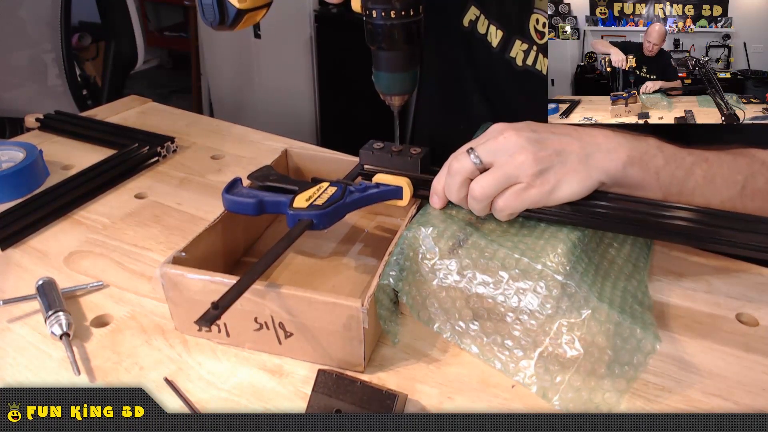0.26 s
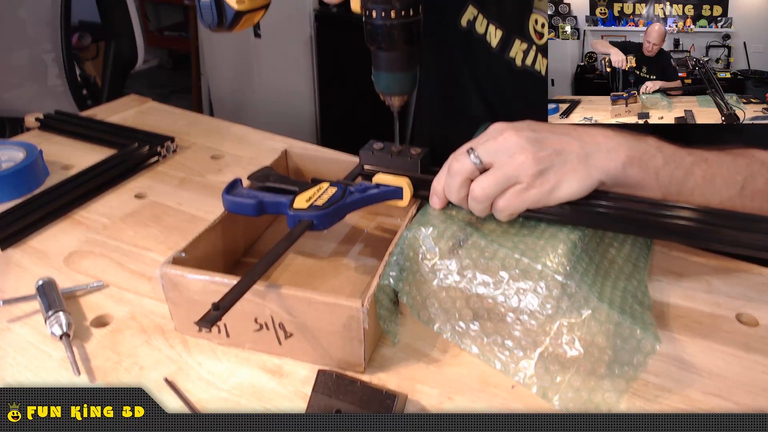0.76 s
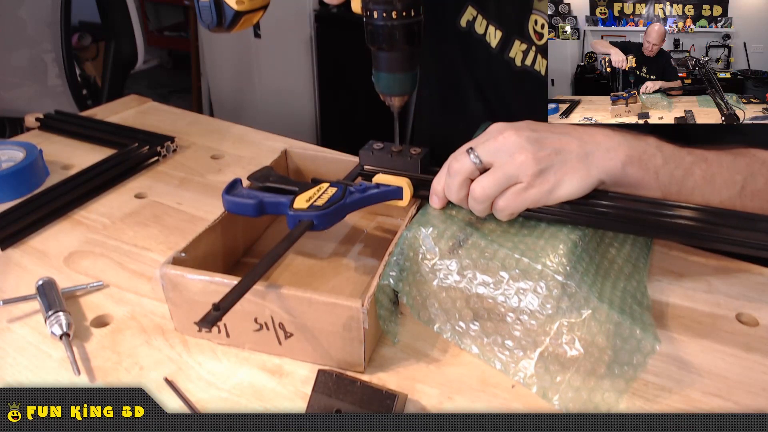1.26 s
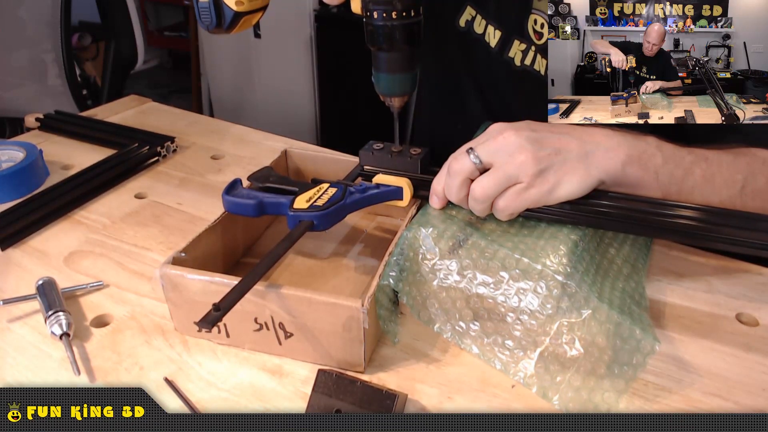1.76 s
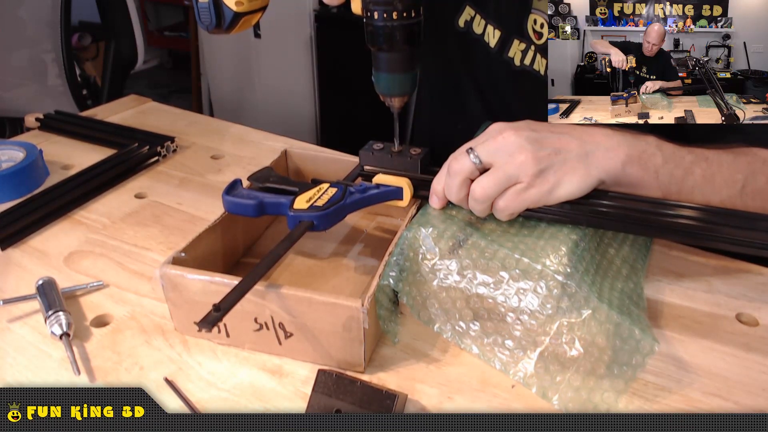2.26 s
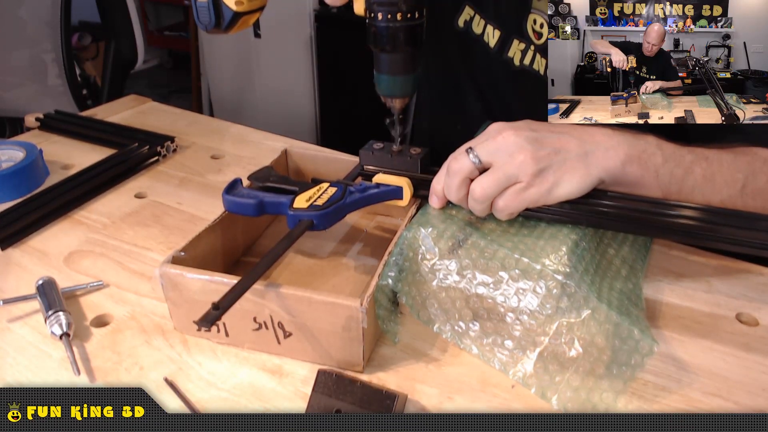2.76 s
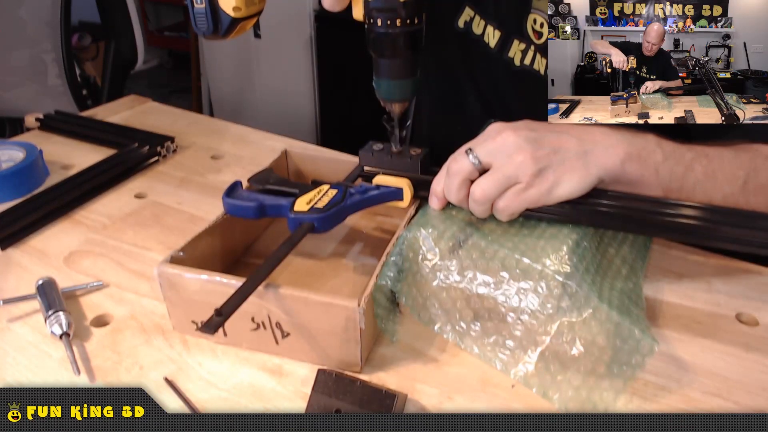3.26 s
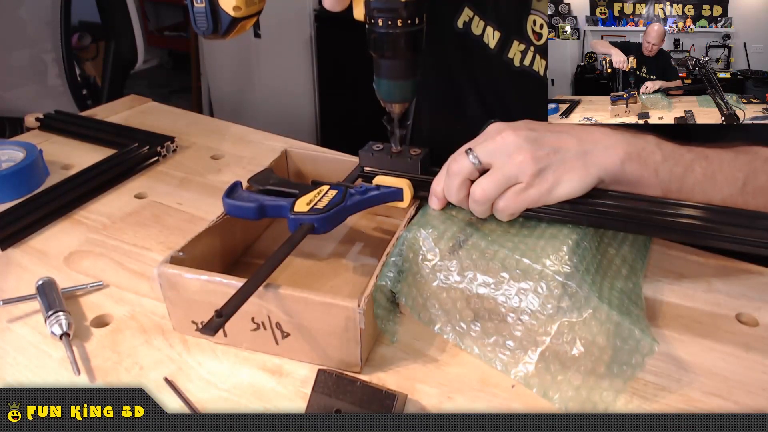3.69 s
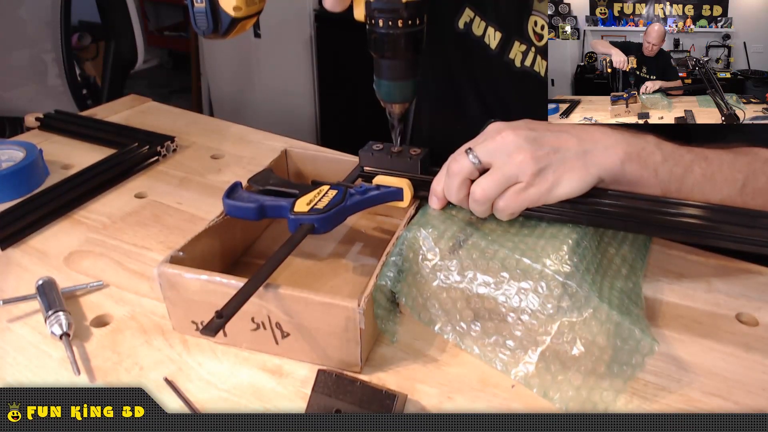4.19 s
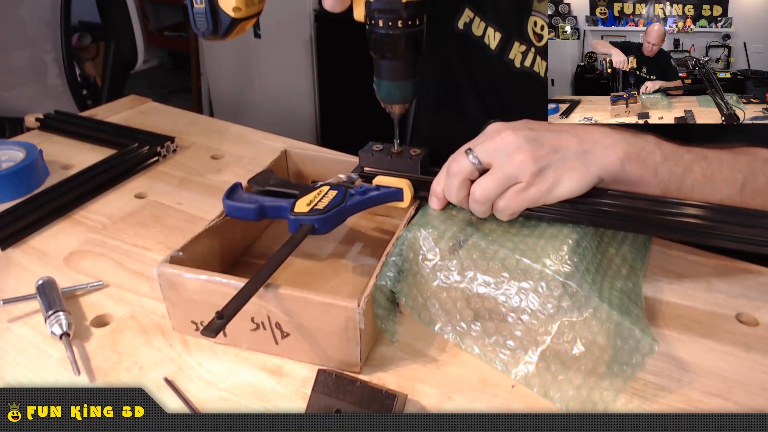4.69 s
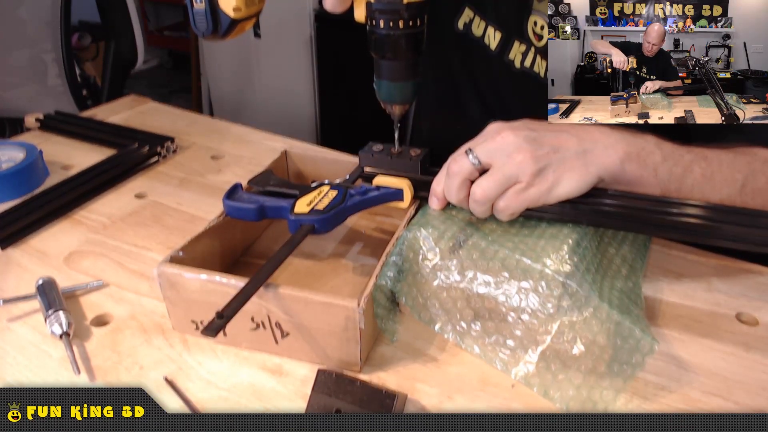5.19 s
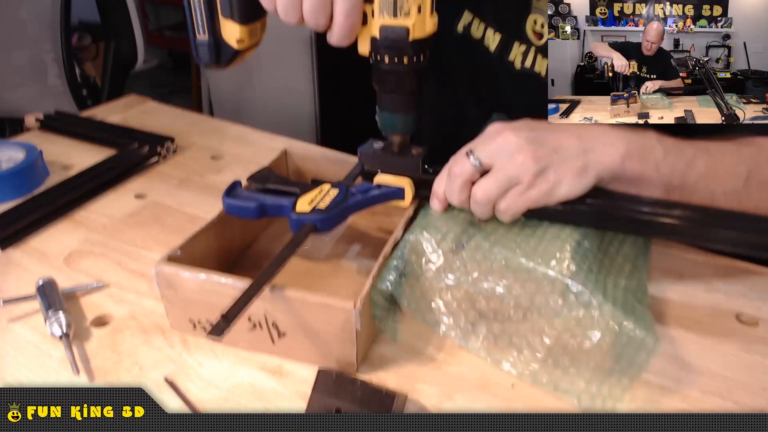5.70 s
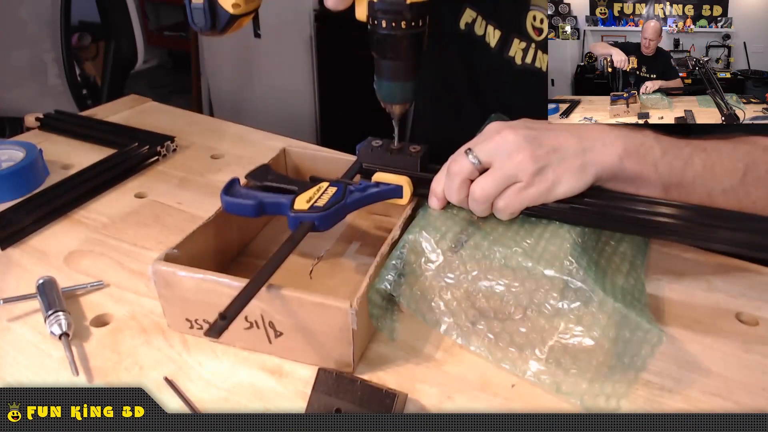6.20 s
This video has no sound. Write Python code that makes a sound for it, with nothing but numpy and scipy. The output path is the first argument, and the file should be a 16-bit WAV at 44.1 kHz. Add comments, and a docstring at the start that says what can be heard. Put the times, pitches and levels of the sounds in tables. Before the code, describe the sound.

A cordless drill whines up to speed, bores through clamped aluminium, snaps through with sharp cracks, then clunks free and revs as a steady thin whistle sings.

```python
"""A whine and rattle climb in pitch as a cordless drill spins up, under the steady whistle of its speed control.
It bores through an aluminium bar clamped in a jig on a workbench: gear tones follow the motor angle,
random tooth impacts ring the housing, and low noise is fan air on the microphone.
The bit drags and snaps through with decaying bursts, then rubs round the hole in noise pulsed by its flutes.
It knocks on the jig on its way out, the loose gears clatter, and the drill revs free."""
import sys
import numpy as np
from scipy import signal
from scipy.fft import rfft, irfft, next_fast_len
from scipy.io import wavfile
from scipy.ndimage import uniform_filter1d, map_coordinates

SR = 44100
rng = np.random.default_rng(int(sys.argv[2]) if len(sys.argv) > 2 else 0)


def waveform_to_disk(signal):
    """Save audio, clipped to [-1, 1], as 16-bit WAV at the path in sys.argv[1]."""
    frames = np.transpose(np.atleast_2d(signal))
    scaled = np.clip(frames, -1, 1) * 32767
    samples = np.round(scaled).astype(np.int16)
    wavfile.write(sys.argv[1], SR, samples)


N = 284445
T = np.arange(N) / SR  # seconds

# Levels in the tables are relative: stages, speed and trims in the functions add to them.
# In every spectrum below, level_db is the gain at that frequency.

# Motor speed under trigger and load: time_s, speed_turns_per_s
MOTOR_SPEED = [(0.0, 154), (0.1, 222), (0.15, 259), (0.24, 299), (0.34, 322), (0.5, 345), (0.6, 373),
               (0.69, 385), (0.86, 390.5), (0.98, 392), (1.14, 370), (1.32, 357.5), (1.8, 339.5),
               (2.1, 346.6), (2.3, 341), (2.5, 329), (2.63, 313), (2.72, 283), (2.78, 252), (2.8, 219),
               (2.84, 235), (2.89, 268), (3.0, 285), (3.1, 297), (3.19, 311), (3.3, 319.5), (3.45, 311.6),
               (3.65, 318.3), (3.85, 321), (4.25, 316.8), (4.4, 311.5), (4.85, 313.4), (5.08, 301),
               (5.25, 289), (5.34, 269), (5.42, 256), (5.65, 303), (5.77, 289.6), (5.88, 308), (5.94, 305),
               (6.04, 262), (6.11, 237), (6.2, 356), (6.28, 357), (6.45, 325)]
# Backlash, the shake of the gears about their steady motion: time_s, rms_motor_turns
BACKLASH = [(0, .008), (.3, .008), (.55, 0), (1.7, 0), (2.2, .003), (2.55, .001), (2.75, .009),
            (2.95, .006), (3.2, .003), (5.0, .002), (5.25, .001), (5.45, .012), (5.95, .016), (6.16, .018),
            (6.21, .007), (6.3, .007), (6.37, .014), (6.45, .024)]
# Stages of the job: starting, spinning up, fan picking up, biting, boring, deep in the bar, labouring,
# just through, spinning in the hole, draught easing, brushing the wall, leaning on it, side load growing,
# slowing down, drawn out, clear of the metal, revving free. Columns as named in STAGE_COLUMNS
STAGES = [(0, -3, -3, -24, -62, -65, -7, -0.5), (.11, -9, -2.5, -22.5, -61, -65, -1.5, -1.5),
          (.215, -13, -4, -24.5, -42, -68, -1, -2), (.29, -7, -4, -26, -36.5, -70, -2.5, -2),
          (.55, 0.5, -8, -21, -35.5, -66, -4, 0), (1.33, 0, -5.5, -18.5, -37.5, -64, -7.5, 0.5),
          (2.56, -1, -5.5, -17.5, -34, -59, -1, 0), (2.88, -2, -7.5, -17.5, -46.5, -56, -1.5, 0.5),
          (3.2, -2, -15, -16, -42.5, -56, -4.5, 0.5), (3.55, 0.5, -8, -17, -49.5, -52, -8.5, 1),
          (4.05, -0.5, -4, -16, -46, -54, -4, 1), (4.93, 0.5, 0.5, -19.5, -44.5, -48.5, -6, 1),
          (5.12, -0.5, 1.5, -17.5, -45.5, -50, -1, 0), (5.27, 0, 4, -16.5, -45, -52, 1.5, 0.5),
          (5.412, -12, -25, -19.5, -46.5, -68, -10, 3), (5.92, -11, -11.5, -29, -63.5, -75, -2, -2),
          (6.18, -3.5, -7.5, -28, -53, -74, -11, -2.5)]
STAGE_COLUMNS = ["start_s", "tones_db", "growl_db", "low_mids_db", "draught_db", "rubbing_db", "cry_db", "treble_db"]
BLEND_S = 0.039  # one stage passes into the next

# Tones of motor and gears: multiple_of_motor_speed, then level_db at each of the four TONE_SPEEDS
MOTOR_TONES = [(2.09, -55.5, -70, -72, -80), (2.86, -57, -53, -52, -50.5), (5.154, -56, -55, -53, -48),
               (5.44, -58, -50, -49, -46), (8.02, -57, -48.5, -49.5, -48), (9.2, -54, -58, -58, -55),
               (9.9, -70, -53, -40.5, -43.5), (11.98, -58, -53, -47.5, -44.5), (14.8, -54, -57, -53, -59),
               (18.3, -70, -62, -59, -58), (19.05, -66, -56, -56, -60), (19.75, -68, -59, -55, -58),
               (22.6, -56, -57, -56, -54), (23.2, -55, -62, -62, -60), (23.96, -58, -55, -50, -46),
               (24.65, -60, -53, -52.5, -56), (28.88, -69, -63, -57, -53), (30.2, -75, -68, -58, -66),
               (31, -80, -61, -66, -72), (33.77, -55.5, -63, -70, -78), (34.5, -52, -62, -66, -78)]
# Speeds at which the tone levels are given: speed_turns_per_s
TONE_SPEEDS = [315, 342, 355, 388]
# Resonance of the gearbox at certain speeds: speed_turns_per_s, growl_db, cry_db, keen_db
GEARBOX = [(158, -66, -60, -48), (225, -66, -41, -49), (245, -61, -41, -59), (272, -53, -42, -62),
           (290, -49.5, -44, -45.5), (302, -50.5, -44, -46.5), (313, -51.5, -39.5, -48.5),
           (322, -51.5, -41, -46.5), (342, -47, -46, -53), (355, -52, -45, -49), (390, -56, -46, -52)]
# Rates as multiples of the motor speed
MESH, CRY, KEEN, CARRIER, CHUCK = 2.57, 11.3, 21.76, 0.286, 0.0573
CRUISE = 330  # turns per second, the reference for growth with speed
TONES_DB_PER_OCTAVE, TREBLE_DB_PER_OCTAVE, DRAUGHT_DB_PER_OCTAVE = -2, 8, 16.5  # per doubling of speed
LABOUR_SPEED = 308  # turns per second, below which the motor labours
CHATTER_SPEED, SMOOTH_SPEED = 262, 296  # turns per second
# Chatter of the teeth when slow, when fast, and the least chatter once unloaded (0-1)
ROUGH_SLOW, ROUGH_FAST, ROUGH_FREE = 0.97, 0.3, 0.66
UNLOADED_DB, UNLOADED_PLAY = -2, 1.3  # low gear tones weaken and smear without a load (dB, radians)

# Level of the rattle: time_s, level_db
RATTLE_LEVEL = [(0, -44), (.2, -37.5), (.65, -34.5), (1.15, -34.5), (1.6, -36), (2.6, -35), (2.95, -37),
                (3.3, -36.5), (5.33, -36), (5.4, -37), (5.425, -40), (5.48, -38), (5.6, -39.5), (5.93, -46),
                (6.09, -54), (6.19, -39.5), (6.45, -44)]
# Spectra of the rattle while boring, spinning in the hole and running free: frequency_hz, level_db
BORING_SPECTRUM = [(120, -34), (200, -9.5), (385, -9.5), (515, -9.5), (607, -9), (874, -5), (1210, -5.5),
                   (2060, -0.5), (2510, -2), (2700, -0.5), (4030, -2), (5700, -9), (9140, -13),
                   (11400, -18), (15500, -37)]
IN_HOLE_SPECTRUM = [(120, -20), (200, -15.5), (392, -13.5), (525, -16), (596, -14), (653, -5.5), (783, -5),
                    (1190, -7.5), (1620, -3), (3120, -1), (4030, -2.5), (5490, -6.5), (6710, -8),
                    (11000, -14.5), (15500, -35)]
FREE_SPECTRUM = [(150, -24), (230, -22), (420, -44), (700, -17), (1030, 3), (1300, -12), (1900, -11),
                 (2300, 4), (2800, 10), (3300, 3), (4100, 7), (5300, 2), (6100, -10), (7700, -3.5),
                 (10000, -13), (12000, -6), (15500, -6)]
# Resonances of drill housing and bar: frequency_hz, width_hz, gain_db
BODY_MODES = [(287.5, 13, 4), (386, 90, -6), (517.4, 43, 9.5), (610, 33, -13), (710, 53, -1.5),
              (1286, 280, -3.5), (1528, 115, 4.5), (2210, 40, 3.5), (2530, 690, -3.5), (2750, 150, 3),
              (4250, 210, 2.5), (5700, 960, -4.5), (7630, 1100, 3), (9160, 560, 4), (11000, 660, 0.5)]
REPEAT_LOADED, REPEAT_FREE = 0.09, 0.5  # share of impacts repeating with each carrier turn (0-1)
SCRAPE_S, SCRAPE_WIDTH_S, SCRAPE_DB = 5.63, 0.083, 2.5  # flutes hiss on the jig as the bit is drawn out

# Whistle, fading when the trigger is eased or fully pressed: time_s, level_db
WHISTLE_LEVEL = [(0, -46.5), (2.1, -46), (2.9, -43), (3.6, -46), (5.35, -43.5), (5.68, -53), (5.85, -45.5),
                 (6.06, -66), (6.12, -57), (6.23, -43), (6.36, -58)]
WHISTLE_HZ = 3906.5

# Spectrum of the lumpy fan air at the microphone: frequency_hz, level_db
AIR_SPECTRUM = [(8, 1.5), (20, 5), (35, 6.5), (50, 1.5), (70, -8.5), (100, -13), (150, -26), (220, -54),
                (400, -46), (900, -72)]
# Spectrum of the flapping gusts: frequency_hz, level_db
GUST_SPECTRUM = [(30, -19), (55, 9), (75, 14), (130, 0), (180, -6.5), (260, -13.5), (500, -59)]
# Strongest puffs of fan air: time_s, boost_db
PUFFS = [(.38, 0), (.5, 2), (.65, 8.5), (0.862, 10), (1.01, 6), (1.09, 5), (1.2, 2.5), (1.55, 5.5),
         (2.11, 4), (2.3, 3), (2.45, 5), (2.64, -2), (3.38, 0), (4.25, 6), (5.595, 4), (6.147, 31),
         (6.34, 12), (6.4, 18)]
PUFF_WIDTH_S = 0.016

# Spectrum of the bit against the wall of the hole: frequency_hz, level_db
WALL_SPECTRUM = [(400, -36), (750, 1.5), (1150, -25), (1620, 8), (2100, -4.5), (3200, -12), (6000, -24),
                 (15000, -60)]

# Catches of the bit in the bar: start_s, level_db, thud_relative_db, crack_relative_db, metal_t60_s
BAR_KNOCKS = [(2.632, -20, -29, -5, 0.048), (2.664, -19.5, -24, -12, 0.027), (2.691, -15.5, -16, -3, 0.032),
              (2.724, -21, -18, -8, 0.029), (2.7495, -19, -12, -14, 0.083), (2.779, -19, -4, -8, 0.034),
              (2.788, -8, -35, -2, 0.015), (2.79, -2.5, -18, 1, 0.023), (2.801, -24, -4.5, 0, 0.17),
              (3.327, -14, -32, -13, 0.028), (3.44, -19, -20.5, -9, 0.013), (5.398, -23.5, -11, -10, 0.043)]
# Clunks of the bit on the jig: start_s, level_db, thud_relative_db, crack_relative_db, metal_t60_s
JIG_CLUNKS = [(5.45, -30, 3.5, -12, 0.04), (5.456, -13, -8, -10, 0.011), (5.459, -29, 10, -20, 0.02),
              (5.4628, -14, -8, -8, 0.013), (5.468, -26, 5, -20, 0.024), (5.48, -31.5, 0, -14, 0.15),
              (5.502, -38.5, 9, -14, 0.1), (5.5916, -17, -12, -14, 0.013)]
# Spectra of the struck bar, the bench, the cracking chip and the jig: frequency_hz, level_db
BAR_SPECTRUM = [(300, -47), (800, -22), (1150, -1.5), (1400, -13.5), (1840, 1.5), (2300, -3), (2660, -6.5),
                (3200, -20), (4400, -16), (6000, -16.5), (15000, -44)]
BENCH_SPECTRUM = [(60, -7), (200, -8.5), (290, -1.5), (400, -5), (560, -1), (760, -3.5), (1100, -6),
                  (1800, -15), (6000, -48)]
CRACK_SPECTRUM = [(1500, -27), (4000, -10), (5300, -14), (6300, 2), (7500, -7.5), (8700, -17),
                  (10100, -9.5), (12500, -17), (16000, -37)]
JIG_SPECTRUM = [(300, -22), (700, -16), (1050, -0.5), (1400, 8), (1900, 4), (2800, -1), (3400, -3),
                (4300, -4), (5400, -4), (7000, -8), (15000, -30)]
# Resonances of the bar: frequency_hz, width_hz, gain_db
BAR_MODES = [(1900, 170, -4), (2740, 110, 8), (4340, 50, 4), (6400, 54, -11)]

# Bursts of the unloaded gears as the motor is throttled: time_s, level_db
CLATTERS = [(5.942, -41), (6.014, -47), (6.055, -48), (6.115, -43)]
CLATTER_WIDTH_S = 0.012
# Spectrum of the gearcase: frequency_hz, level_db
GEARCASE_SPECTRUM = [(400, -45), (790, 6), (1050, -17), (2150, -20), (2750, 8), (3500, -1), (4300, -3),
                     (5300, -9), (6500, -10), (9000, -25), (15000, -38)]
LURCH_PEAK_S, LURCH_DB = 6.2, 2  # one crest of the free chuck's lurching, and its swing
EDGE_HZ = 15500  # upper limit of the band


def amp(db):
    """Level law: decibels to gain."""
    return 10 ** (np.asarray(db) / 20)


def unit(x):
    """Normalisation to rms 1."""
    return x / np.sqrt(np.mean(x ** 2) + 1e-20)


def running_rms(x):
    """Root mean square over a sliding quarter of a second."""
    return np.sqrt(uniform_filter1d(x ** 2, SR // 4) + 1e-12)


def read_column(rows, where, axis=1):
    """Linear interpolation of one column against the first."""
    rows = np.asarray(rows, float)
    return np.interp(where, rows[:, 0], rows[:, axis])


def stage(name):
    """A named column, held through each stage and blended into the next."""
    rows = np.asarray(STAGES, float)
    held = rows[np.searchsorted(rows[1:, 0], T), STAGE_COLUMNS.index(name)]
    return uniform_filter1d(held, int(BLEND_S * SR))


def shape(points, hz):
    """A spectrum in dB, joined by straight lines over log frequency."""
    f, db = np.transpose(points)
    return np.interp(np.log(hz + 1), np.log(f + 1), db)


def colour(x, points, modes=()):
    """Linear filtering by a smooth spectrum plus bell-shaped resonances."""
    size = next_fast_len(len(x))
    hz = np.fft.rfftfreq(size, 1 / SR)
    db = shape(points, hz)
    for f, width, gain_db in modes:
        db = db + gain_db / (1 + (2 * (hz - f) / width) ** 2)
    return irfft(rfft(x, size) * amp(db), size)[:len(x)]


def band(x, lo, hi):
    """Zero-phase band-pass between two frequencies in Hz."""
    return signal.sosfiltfilt(signal.butter(3, [lo, hi], "band", fs=SR, output="sos"), x)


def wander(hz):
    """Smooth random fluctuation of rms 1, changing about hz times a second."""
    steps = np.linspace(0, T[-1], int(T[-1] * hz * 8) + 2)
    slow = rng.standard_normal(len(steps))
    for _ in range(2):
        slow = uniform_filter1d(slow, size=4)
    return unit(np.interp(T, steps, slow))


def swell(s, width):
    """A Gaussian rise and fall of height 1 around time s."""
    return np.exp(-((T - s) / width) ** 2)


def clear():
    """Unloading: rises from 0 to 1 as the bit leaves the hole."""
    return np.clip((T - 5.85) / 0.2, 0, 1)


def add(mix, s, sound):
    """Superposition: mixes a sound in at time s."""
    part = mix[max(round(s * SR), 0):][:len(sound)]
    part += sound[:len(part)]


def whine(speed, turns, flutter=0.3, play=0.28, scatter=0.27, labour_db=9.5):
    """Order tones: tooth and slot tones lock to the motor angle; play makes each one flutter and smear."""
    out = np.zeros(N)
    for order, *levels_db in MOTOR_TONES:
        db = np.interp(speed, TONE_SPEEDS, levels_db)
        # the tones fade when the motor labours, the highest most
        db = db - labour_db * order / 12 * np.maximum(LABOUR_SPEED - speed, 0)
        phase = 2 * np.pi * order * turns + play * wander(32)
        if order < CRY / 2:
            db = db + UNLOADED_DB * clear()
            phase = phase + UNLOADED_PLAY * clear() * wander(120)
        steady = (1 + flutter * wander(48)) * np.cos(phase)
        smeared = scatter * wander(110) * np.sin(phase)
        out += amp(db) * (steady + smeared)
    return out * amp(stage("tones_db") + TONES_DB_PER_OCTAVE * np.log2(speed / CRUISE))


def mesh(order, turns, db, rough, smear_hz, surge=0.22, runout=0.19, lopsided=0.14):
    """Load modulation: a gear tone swells twice per chuck turn and chatter breaks it into a narrow rasp."""
    chatter = (wander(smear_hz) + 1j * wander(smear_hz)) / np.sqrt(2)
    angle = 2 * np.pi * CHUCK * turns
    load = unit(1 + surge * wander(28) + runout * np.cos(2 * angle) + lopsided * np.cos(angle))
    tooth = (np.sqrt(1 - rough ** 2) + rough * chatter) * load
    return np.sqrt(2) * amp(db) * (tooth * np.exp(2j * np.pi * order * turns)).real


def gears(speed, turns):
    """Gearbox resonance: growl on the slow mesh, cry on the fast one and a keen tone above both."""
    # the teeth chatter more as the motor slows, and once they are unloaded
    rough = np.interp(speed, [CHATTER_SPEED, SMOOTH_SPEED], [ROUGH_SLOW, ROUGH_FAST])
    rough = np.maximum(rough, ROUGH_FREE * np.sqrt(clear()))
    growl = mesh(MESH, turns, read_column(GEARBOX, speed, axis=1), rough, smear_hz=75)
    cry = mesh(CRY, turns, read_column(GEARBOX, speed, axis=2), rough, smear_hz=200)
    keen_phase = 2 * np.pi * KEEN * turns + 0.65 * wander(60)
    keen = unit((1 + 0.21 * wander(35)) * np.cos(keen_phase))
    # the keening comes from the motor's own pinion and follows the motor tones
    keen_db = read_column(GEARBOX, speed, axis=3) + stage("tones_db")
    return growl * amp(stage("growl_db")) + cry * amp(stage("cry_db")) + keen * amp(keen_db)


def teeth(turns, share, count=320):
    """Cyclic impacts: worn teeth repeat with each turn of the planet carrier, the rest is chance."""
    pattern = rng.standard_normal(count)
    worn = map_coordinates(pattern, [CARRIER * turns % 1 * count], mode="grid-wrap")
    return np.sqrt(share) * unit(worn) + np.sqrt(1 - share) * rng.standard_normal(N)


def rattle(speed, turns, flute_depth=0.047, mesh_depth=0.28, carrier_depth=0.021, grain=0.096,
           patchy_db=0.5, level_db=-2.5, treble_db=-8, low_db=-1):
    """Impact excitation: dense tiny blows of teeth and chips, pulsed by the mesh, ring housing and bar."""
    beat = 1 + mesh_depth * np.cos(2 * np.pi * MESH * turns)
    beat = beat + carrier_depth * np.cos(2 * np.pi * CARRIER * turns)
    # the two flutes of the bit rub twice in each turn of the chuck
    beat = beat * (1 + flute_depth * np.cos(2 * np.pi * 2 * CHUCK * turns + wander(1.71)))
    through = np.clip((T - 2.65) / 0.093, 0, 1)  # the bit breaks through
    free = clear()
    impacts = teeth(turns, REPEAT_LOADED + (REPEAT_FREE - REPEAT_LOADED) * free)
    impacts = impacts * beat * np.exp(grain * wander(900)) * amp(patchy_db * wander(49))

    shares = [1 - through, through * (1 - free), free]
    spectra = [BORING_SPECTRUM, IN_HOLE_SPECTRUM, FREE_SPECTRUM]
    ringing = np.zeros(N)
    for share, spectrum in zip(shares, spectra):
        ringing += share * unit(colour(impacts, spectrum, BODY_MODES))

    low, high = band(ringing, 130, 650), band(ringing, 8000, 20000)
    mid = (band(ringing, 130, 20000) - low - high) / running_rms(band(ringing, 1300, 5000))
    # low mids follow the contact of bit and metal
    low = low / running_rms(low) * amp(stage("low_mids_db") + low_db)
    # the treble dulls below cruising speed
    bright_db = TREBLE_DB_PER_OCTAVE * np.minimum(np.log2(speed / CRUISE), 0)
    bright_db = bright_db + SCRAPE_DB * swell(SCRAPE_S, SCRAPE_WIDTH_S)
    high = high / running_rms(high) * amp(treble_db + bright_db + stage("treble_db"))
    return (low + mid + high) * amp(read_column(RATTLE_LEVEL, T) + level_db)


def whistle(level_db=0.64, waver=0.048, drift_db=0.5):
    """Chopped current: the trigger switches the supply at a fixed rate, and the windings sing with it."""
    db = read_column(WHISTLE_LEVEL, T) + level_db + drift_db * wander(4)
    return np.sqrt(2) * amp(db) * (1 + waver * wander(25)) * np.sin(2 * np.pi * WHISTLE_HZ * T)


def draught(speed, lumpy_db=2.0, gust_db=-10, gust_from_db=-30, gust_growth=0.57):
    """Turbulence: lumpy fan air hits the microphone, harder with speed; strong gusts flap higher."""
    air = colour(rng.standard_normal(N), AIR_SPECTRUM)
    gust = colour(rng.standard_normal(N), GUST_SPECTRUM)
    db = stage("draught_db") + DRAUGHT_DB_PER_OCTAVE * np.log2(speed / CRUISE) + lumpy_db * wander(12)
    for s, boost_db in PUFFS:
        db = db + boost_db * swell(s, PUFF_WIDTH_S)
    flap = amp(gust_db + gust_growth * (db - gust_from_db)) * unit(gust)
    return (air / running_rms(air) + flap) * amp(db)


def rubbing(turns, uneven_db=1.5, level_db=2):
    """Friction noise: two flutes brush the hole in turn, one harder because the bit runs out of true."""
    angle = 2 * np.pi * CHUCK * turns
    touch = np.exp(2.6 * np.cos(2 * angle)) * (1 + 0.38 * np.cos(angle))
    touch = touch * amp(uneven_db * wander(13))
    noise = colour(rng.standard_normal(N) * touch, WALL_SPECTRUM)
    return unit(noise) * amp(stage("rubbing_db") + level_db)


def knocks(rows, ring, modes=(), rise_s=0.0003, thud_length=1.76, level_db=-8.5):
    """Damped impact: each catch of the bit is a noise burst that rings struck metal and thumps the bench."""
    out, t = np.zeros(N), np.arange(SR // 3) / SR
    for s, db, thud_db, crack_db, t60 in rows:
        metal, bench, crack = (unit(colour(rng.standard_normal(len(t)), spectrum, modes))
                               for spectrum in (ring, BENCH_SPECTRUM, CRACK_SPECTRUM))
        decay = np.exp(-np.log(1000) * t / t60)
        burst = metal * decay
        burst += amp(thud_db) * bench * decay ** (1 / thud_length)  # the thud dies later
        burst += amp(crack_db) * crack * decay ** 2.3  # the crack dies sooner
        add(out, s, amp(db + level_db) * burst * (1 - np.exp(-t / rise_s)))
    return out


def workshop(x, t60=0.19, wet_db=-15):
    """Reverberation: a short, dense decaying tail from the bench and the nearby walls."""
    t = np.arange(SR // 2) / SR
    tail = rng.standard_normal(len(t)) * np.exp(-np.log(1000) * t / t60) * (t > 0.004)
    tail = colour(tail, [(200, 5.0), (2500, -17.0), (12000, 8.0)])
    return x + amp(wet_db) * signal.fftconvolve(x, tail / np.linalg.norm(tail))[:N]


def lurch(turns):
    """Rotational imbalance: gain of the drill noise as the free chuck swings round, once in each turn."""
    angle = 2 * np.pi * CHUCK * (turns - np.interp(LURCH_PEAK_S, T, turns))
    return amp(LURCH_DB * clear() * np.cos(angle))


def clatter():
    """Backlash impacts: loose teeth tumble in short bursts that ring the gearcase."""
    bursts = sum(amp(db) * swell(s, CLATTER_WIDTH_S) for s, db in CLATTERS)
    return unit(colour(rng.standard_normal(N), GEARCASE_SPECTRUM)) * bursts


def scene():
    """Common drive: one motor speed rules tones, rattle and fan; one microphone feeds both channels."""
    speed = read_column(MOTOR_SPEED, T) * (1 + 0.0012 * wander(8))
    turns = np.cumsum(speed) / SR + read_column(BACKLASH, T) * wander(70)
    machine = whine(speed, turns) + gears(speed, turns) + rattle(speed, turns)
    drill = machine * lurch(turns) + clatter() + whistle()
    hits = knocks(BAR_KNOCKS, BAR_SPECTRUM, BAR_MODES) + knocks(JIG_CLUNKS, JIG_SPECTRUM)
    sound = drill + rubbing(turns) + draught(speed) + workshop(hits)
    return np.array([sound, sound])


def record(dry):
    """Soft saturation rounds off peaks towards 0.42 of full scale, then a low-pass limits the band."""
    rounded = dry / (1 + (dry / 0.42) ** 4) ** 0.25
    lowpass = signal.firwin(255, EDGE_HZ, window=("kaiser", 9), fs=SR)
    return signal.oaconvolve(rounded, lowpass[None], "same")


dry = scene()
out = record(dry)
waveform_to_disk(out)
```